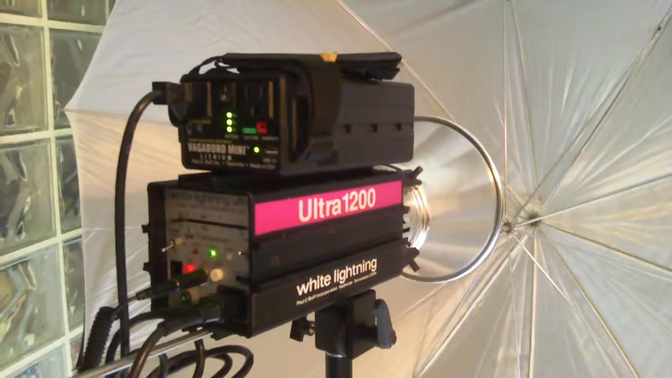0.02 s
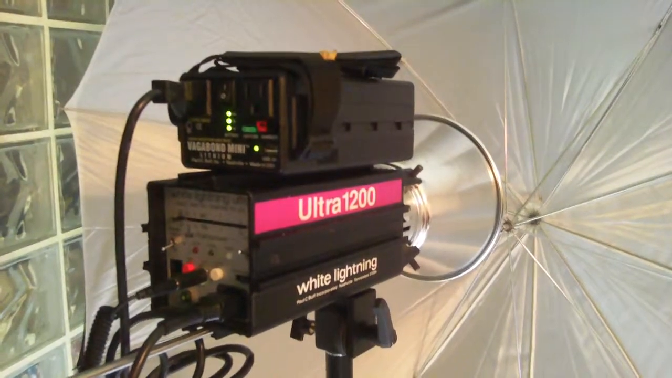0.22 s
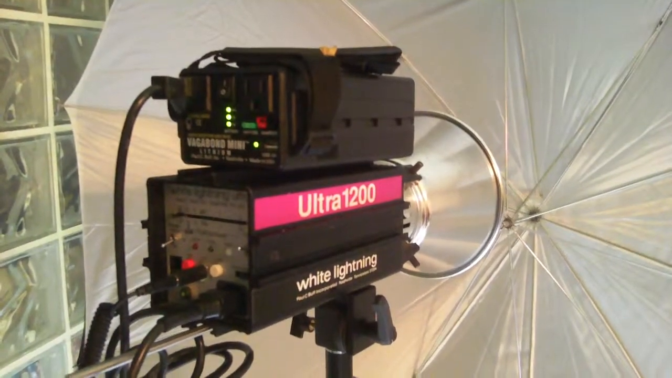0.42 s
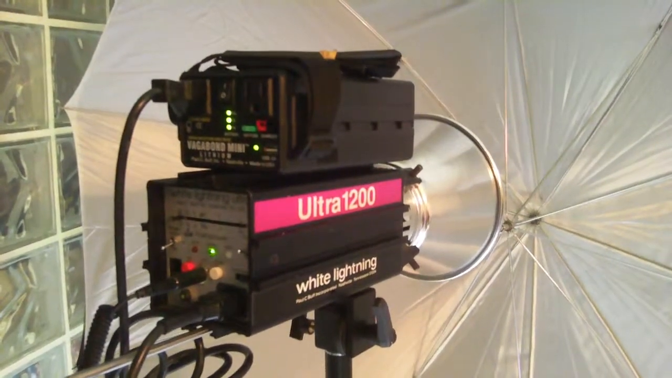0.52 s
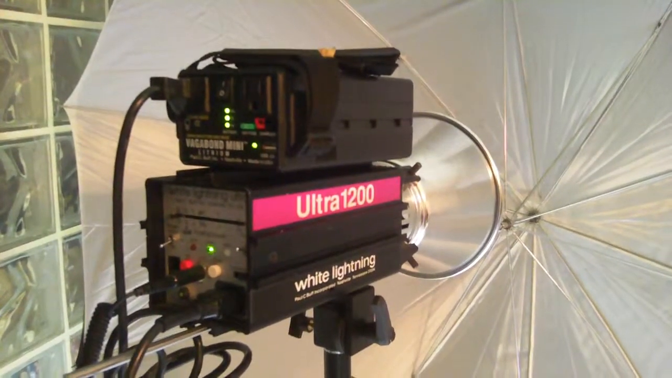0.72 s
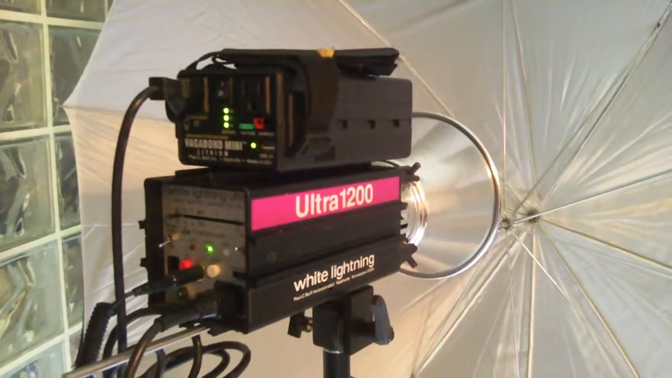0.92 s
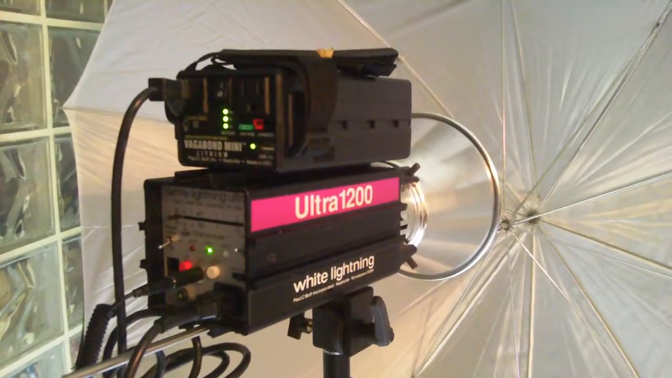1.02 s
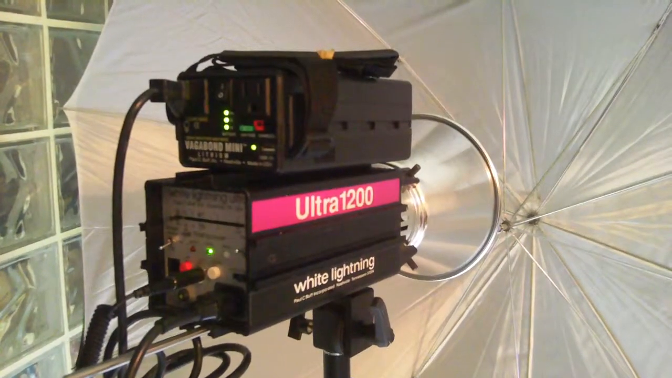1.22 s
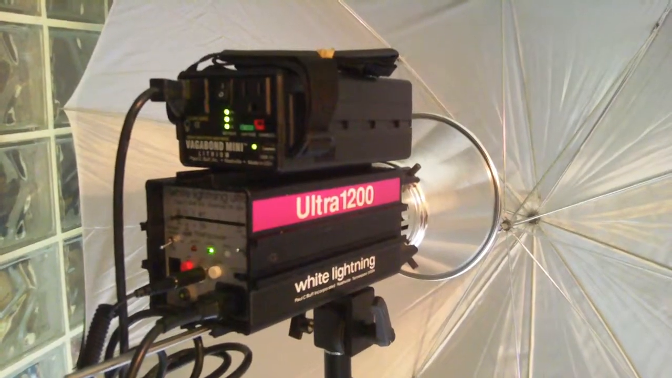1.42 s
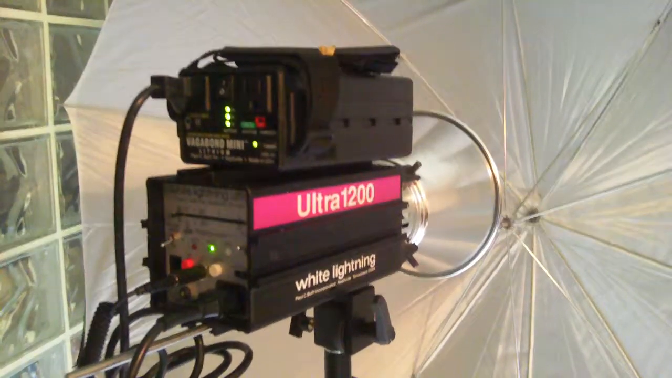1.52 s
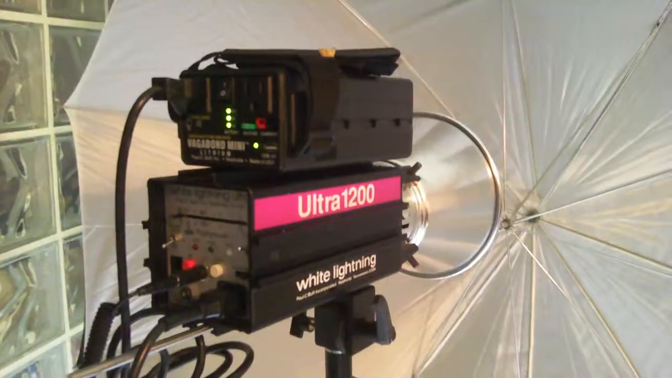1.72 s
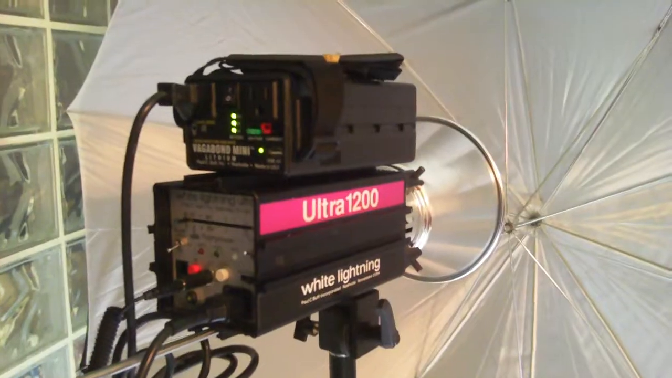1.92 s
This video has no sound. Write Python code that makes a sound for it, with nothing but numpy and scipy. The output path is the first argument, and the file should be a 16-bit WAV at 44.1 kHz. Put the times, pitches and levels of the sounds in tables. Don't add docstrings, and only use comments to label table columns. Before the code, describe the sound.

Close to a camera microphone in a quiet indoor studio, a flash unit cracks brightly, a tiny dry rattle follows, then a second matching crack and faint settling ticks, over steady room tone and slight hum.

```python
import sys
import numpy as np
from scipy import signal
from scipy.fft import rfft, irfft
from scipy.io import wavfile
from scipy.ndimage import uniform_filter1d

SR = 44100
rng = np.random.default_rng(int(sys.argv[2]) if len(sys.argv) > 2 else 0)


def to_linear_factor(level_db):
    exponent = np.asarray(level_db, float) / 20
    return 10 ** exponent


def pcm_store(signal):
    levels = np.round(np.clip(np.atleast_2d(signal), -1, 1) * 32767)
    wavfile.write(sys.argv[1], SR, levels.astype(np.int16).T)


N = 88200

# (frequency [Hz], level [dB per Hz])
ROOM_TONE_COLOUR = [(25, -21), (90, -9.5), (230, -1.5), (700, -5), (1100, -8), (1400, -10.5), (3500, -15),
                    (15000, -18)]
# (frequency [Hz], level [dB rms])
MAINS_HUM = [(60, -81), (120, -75.5)]
# (time [s], level [dB])
RATTLE_TICKS = [(1.0475, 2), (1.0502, -3), (1.0515, -6), (1.0545, -1), (1.0575, 1), (1.0597, 3.5),
                (1.062, -1), (1.065, -7), (1.0685, -4), (1.0705, -8), (1.0725, -10), (1.0755, 0),
                (1.0815, -11), (1.094, -14)]
# (frequency [Hz], level [dB], time to fall 60 dB [s])
RATTLE_MODES = [(4660, 0, 0.0044), (5510, -5, .007), (6240, 2, 0.013), (6850, -1, .01), (8040, -2, .008),
                (8750, 0, .005), (9600, -5, .004), (10400, -3, 0.0044), (7440, -4, 0.0054)]
# (time [s], level [dB])
LATE_TICKS = [
    (1.867, 4.5),
    (1.875, -5),
    (1.886, -6),
]
# (frequency [Hz], level [dB], time to fall 60 dB [s])
LATE_TICK_MODES = [(2280, -3, 0.013), (2530, -4, .016), (2820, -3, 0.0059), (5490, -14.5, 0.029)]
# (time [s], level [dB], reflector share [dB])
SHOTS = [
    (0.2036, 1, 1),
    (1.6964, 1, 3),
]
# (delay [s], level [dB], brightness [dB])
SNAPS = [
    (-0.0001, -6.5, -2),
    (0.0007, -9, -10),
    (0.0016, -32, -11),
    (0.0023, 6, 1.5),
    (0.0043, -2, -19),
    (0.0054, -19, -7),
]
# (frequency [Hz], level [dB])
SPARK_COLOUR = [(800, -34), (1200, -19), (2500, -15), (5200, -16.5), (6300, -7.5), (8800, -7.5),
                (10300, -1), (13500, -1), (15300, -12)]
# (frequency [Hz], level [dB], time to fall 60 dB [s])
MOUNT_MODES = [(10340, -12.5, 0.0061), (11100, -10.5, 0.0086), (6200, -28, 0.0037), (4000, -31, 0.0029),
               (3000, -31.5, 0.0025)]
# (frequency [Hz], level [dB], time to fall 60 dB [s])
TUBE_MODES = [(9259, -11, 0.075), (9220, -30, 0.24), (10000, -26, .05), (10350, -20, 0.071),
              (10424, -21.5, 0.094), (11730, -32, 0.046), (11410, -24, .05), (11570, -24, .05),
              (11700, -24, .07), (12339, -29, .05), (12860, -35, .05), (13150, -20.5, 0.079),
              (13385, -27.5, .27)]
# (frequency [Hz], level [dB], time to fall 60 dB [s])
REFLECTOR_MODES = [(940, -43.5, 0.068), (1127, -45, .11), (2153, -44.5, 0.16), (4260, -44, 0.074),
                   (6350, -37, 0.062), (6770, -30.5, 0.077), (7234, -31, 0.071), (7300, -31, 0.065),
                   (8370, -35, 0.057), (8545, -50, 0.037)]

SHOT_DB, MAIN_SNAP_S = -12.5, 0.0026
RISE_S = 0.00015
LOW_CUT_HZ = 1100
NEAR_T60_S, ROOM_T60_S = 0.025, 0.29


def convolve(a, b):
    return signal.fftconvolve(a, b)[:N]


def clicks(times, gains):
    out = np.zeros(N)
    for time, gain in zip(times, gains):
        k = int(time * SR) + np.arange(-8, 9)
        out[k] += gain * np.sinc(k - time * SR) * np.hanning(19)[1:-1]
    return out


def ring(modes, swell_s):
    t = np.arange(SR // 2) / SR
    hz, db, t60 = np.array(modes, float).T[:, :, None]
    phase = rng.random((len(modes), 1))
    decay = np.exp(-np.log(1000) * t / t60)
    tones = to_linear_factor(db) * decay * np.sin(2 * np.pi * (hz * t + phase))
    return tones.sum(0) * (1 - np.exp(-(t + 1 / SR) / swell_s))


def colour(x, table):
    hz = np.maximum(np.arange(len(x) // 2 + 1) * SR / len(x), 1)
    f, db = np.array(table, float).T
    gain = to_linear_factor(np.interp(np.log(hz), np.log(f), db))
    return irfft(rfft(x) * gain * (hz < 15300), len(x))


def low_cut(x):
    return signal.sosfilt(signal.butter(4, LOW_CUT_HZ, "highpass", fs=SR, output="sos"), x)


def fade(start, t60):
    t = np.maximum(np.arange(N) / SR - start, 0)
    return np.exp(-np.log(1000) * t / t60) * (1 - np.exp(-t / RISE_S))


def echoes(t60, gap_s):
    t = np.arange(SR // 2) / SR
    build_up = np.clip(t / gap_s, 0, 1)
    h = rng.standard_normal(len(t)) * np.exp(-np.log(1000) * t / t60) * build_up
    return h / np.sqrt(np.sum(h ** 2))


def room_tone():
    tone_db, flicker_db, hum_waver_db = -57.5, 0.43, 2.3
    hiss = colour(rng.standard_normal(N), ROOM_TONE_COLOUR)
    walk = uniform_filter1d(rng.standard_normal((2, N)), size=3000, axis=1)
    walk = walk / walk.std()
    t = np.arange(N) / SR
    hum = 0
    for hz, db in MAINS_HUM:
        hum = hum + np.sqrt(2) * to_linear_factor(db + hum_waver_db * walk[1]) * np.sin(2 * np.pi * hz * t)
    return hiss / hiss.std() * to_linear_factor(tone_db + flicker_db * walk[0]) + hum


def contacts(table, modes, db):
    scatter_db = 2.5
    out = 0
    for time, level in table:
        change = scatter_db * rng.standard_normal(len(modes))
        mix = np.array(modes) + np.outer(change, [0, 1, 0])
        out = out + convolve(clicks([time], [to_linear_factor(level + db)]), ring(mix, RISE_S))
    return out


def recharge_rattle():
    return contacts(RATTLE_TICKS, RATTLE_MODES, -51.5)


def late_ticks():
    return contacts(LATE_TICKS, LATE_TICK_MODES, -46.5)


def spark_blast():
    spark_db, spark_t60_s = -11, 0.0037
    near_db, far_db = -31, -41.5
    air = colour(rng.standard_normal(N), SPARK_COLOUR)
    out = 0
    for time, level, _ in SHOTS:
        envelope = 0
        for delay, db, _ in SNAPS:
            envelope = envelope + to_linear_factor(SHOT_DB + spark_db + db) * fade(time + delay, spark_t60_s)
        envelope = envelope + to_linear_factor(near_db) * fade(time + MAIN_SNAP_S, NEAR_T60_S)
        envelope = envelope + to_linear_factor(far_db) * fade(time + MAIN_SNAP_S, ROOM_T60_S)
        same_air = np.roll(air, int(time * SR)) / air.std()
        out = out + to_linear_factor(level) * envelope * same_air
    return low_cut(out)


def flash_ring():
    swell_s, luck_db = 0.001, 0.7
    delay, db, bright = np.array(SNAPS).T
    mount = ring(MOUNT_MODES, RISE_S)
    sizzle = ring([(13320, 1, 0.0063)], 0.0006)
    tube = ring(TUBE_MODES, swell_s)
    reflector = ring(REFLECTOR_MODES, swell_s)
    out = 0
    for time, level, share in SHOTS:
        luck = luck_db * rng.standard_normal(len(SNAPS))
        out = out + convolve(clicks(time + delay, to_linear_factor(level + db + luck)), mount)
        out = out + convolve(clicks(time + delay, to_linear_factor(level + db + bright)), sizzle)
        main_snap = clicks([time + MAIN_SNAP_S], [to_linear_factor(level)])
        out = out + convolve(main_snap, tube + to_linear_factor(share) * reflector)
    return to_linear_factor(SHOT_DB) * low_cut(out)


def scene():
    near_db, room_db, small_db = -6.5, -21.5, -3.5
    walls = echoes(ROOM_T60_S, 0.004)
    near = echoes(NEAR_T60_S, 0.00078)
    small = recharge_rattle() + late_ticks()
    shots = flash_ring()
    wet = convolve(shots, to_linear_factor(near_db) * near + to_linear_factor(room_db) * walls)
    wet = wet + to_linear_factor(small_db) * convolve(small, walls)
    return np.tile(room_tone() + small + spark_blast() + shots + wet, (2, 1))


def roll_off(x):
    return signal.sosfilt(signal.butter(12, 16540, fs=SR, output="sos"), x)


def record(dry):
    notch_hz, notch_width_hz, edge_hz = 7840, 310, 15500
    x = signal.lfilter(*signal.iirnotch(notch_hz, notch_hz / notch_width_hz, fs=SR), dry)
    x = signal.sosfilt(signal.ellip(8, 0.2, 60, edge_hz, fs=SR, output="sos"), x)
    return roll_off(x)


dry = scene()
out = record(dry)
pcm_store(out)
```